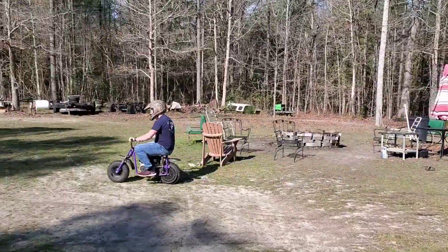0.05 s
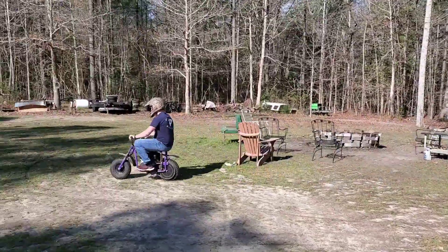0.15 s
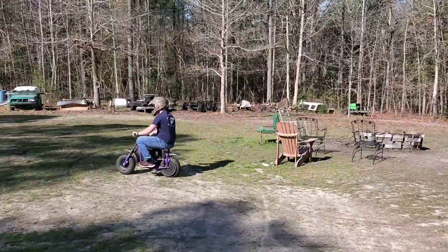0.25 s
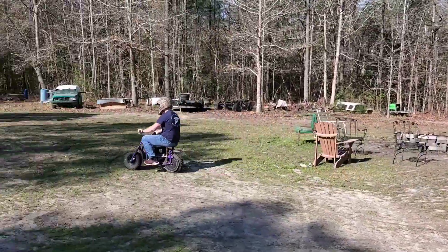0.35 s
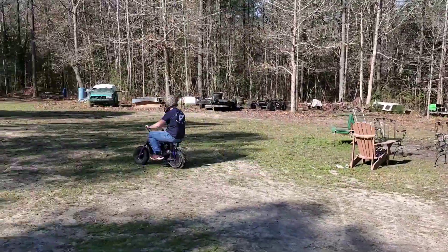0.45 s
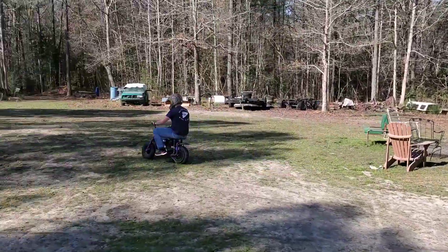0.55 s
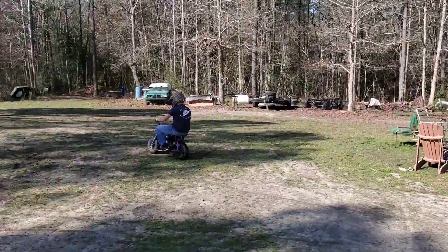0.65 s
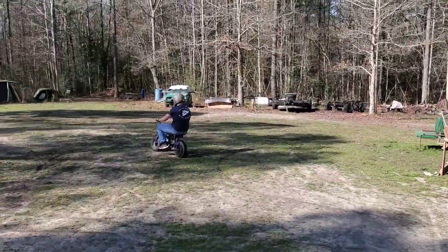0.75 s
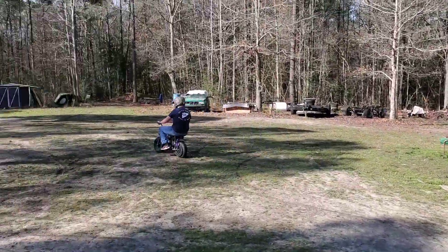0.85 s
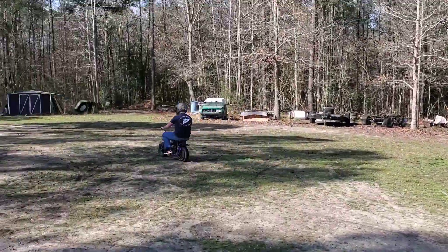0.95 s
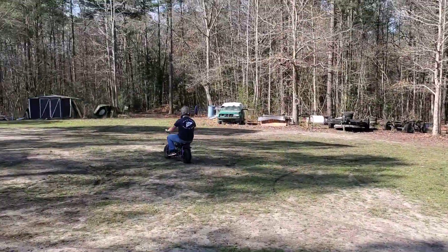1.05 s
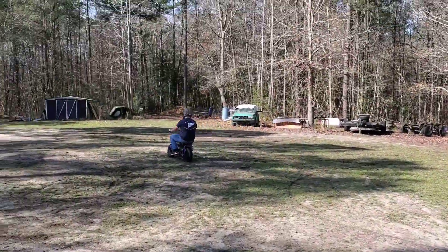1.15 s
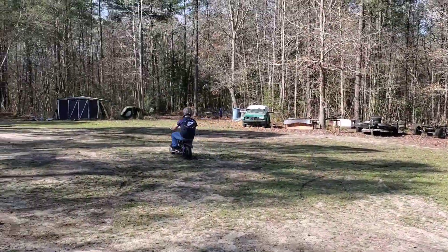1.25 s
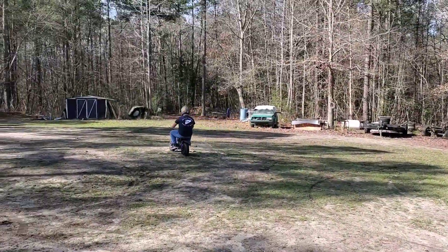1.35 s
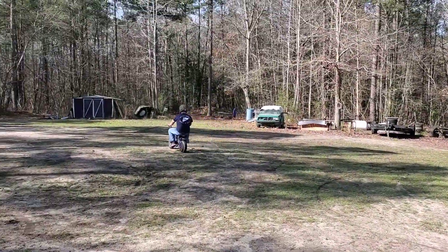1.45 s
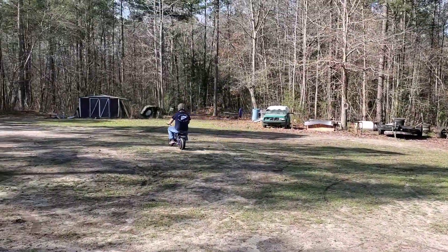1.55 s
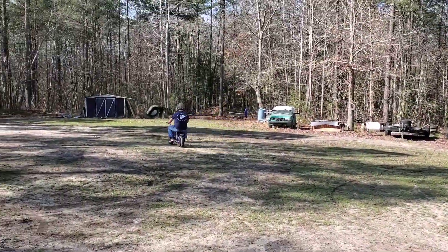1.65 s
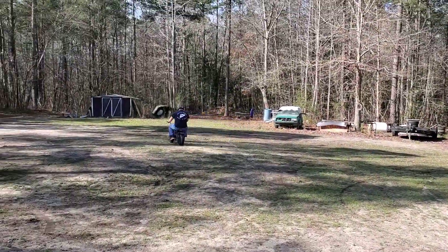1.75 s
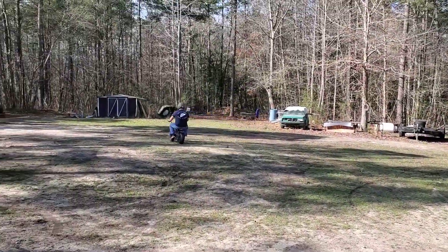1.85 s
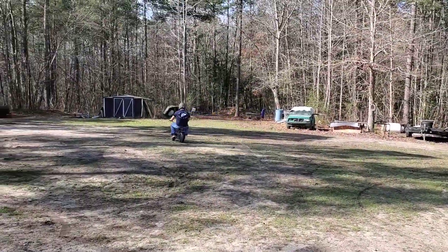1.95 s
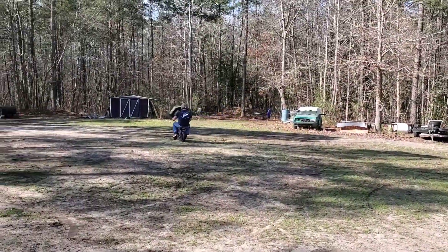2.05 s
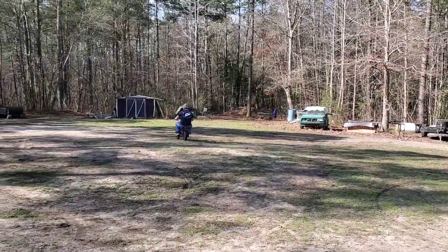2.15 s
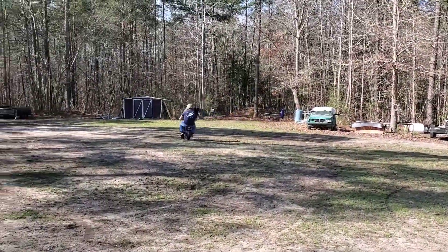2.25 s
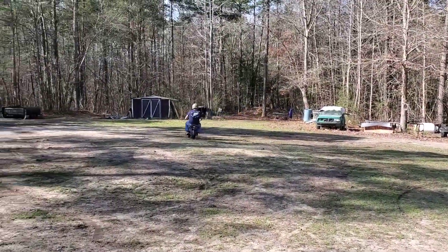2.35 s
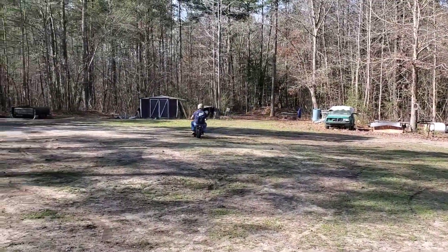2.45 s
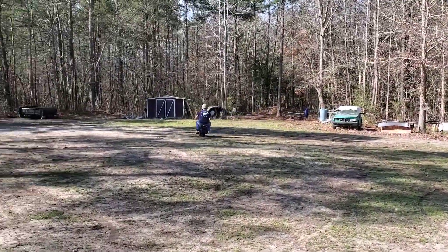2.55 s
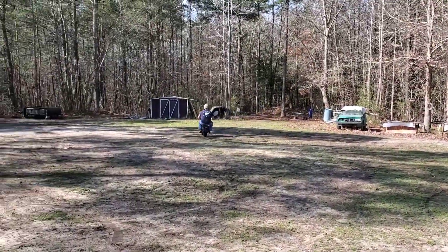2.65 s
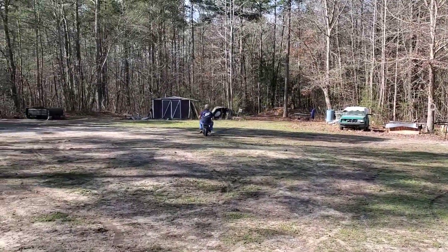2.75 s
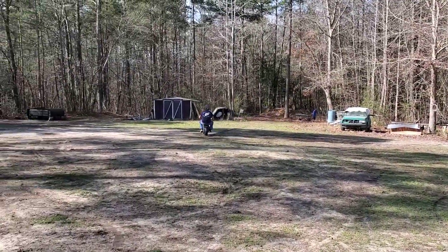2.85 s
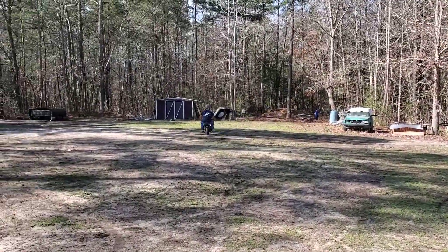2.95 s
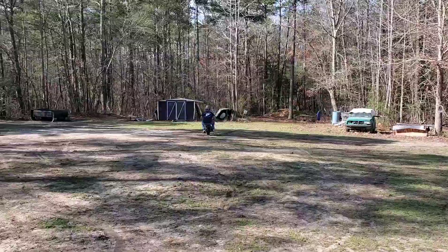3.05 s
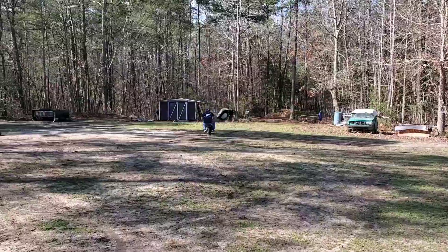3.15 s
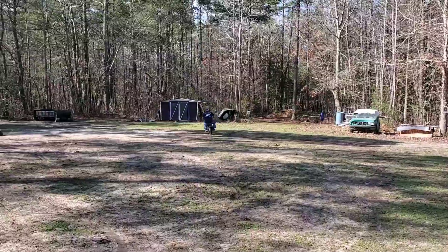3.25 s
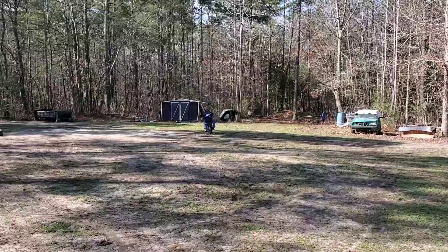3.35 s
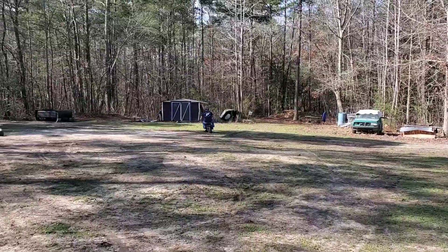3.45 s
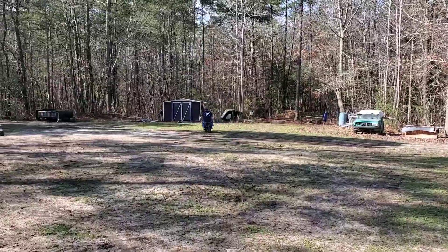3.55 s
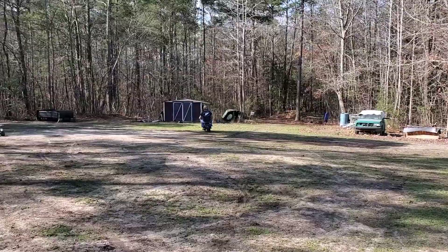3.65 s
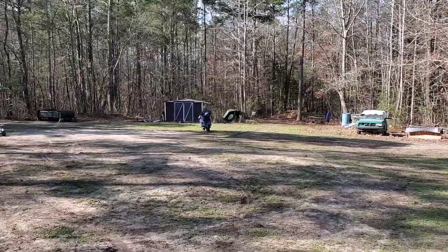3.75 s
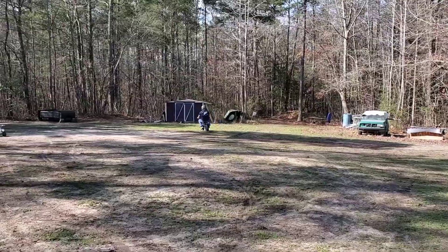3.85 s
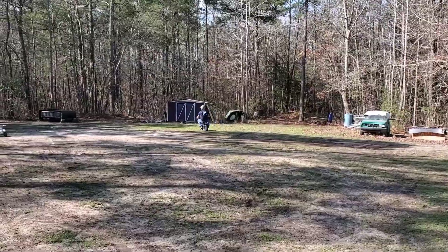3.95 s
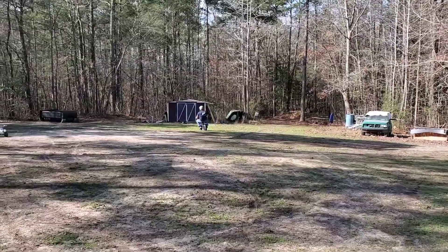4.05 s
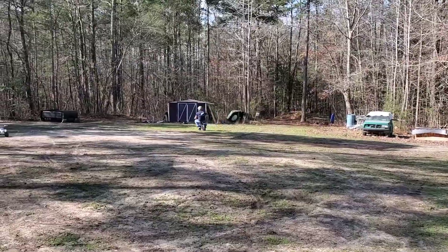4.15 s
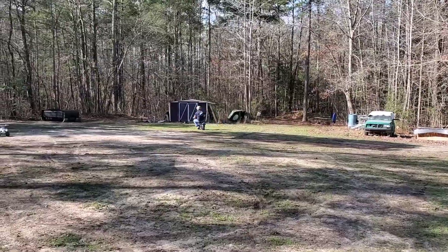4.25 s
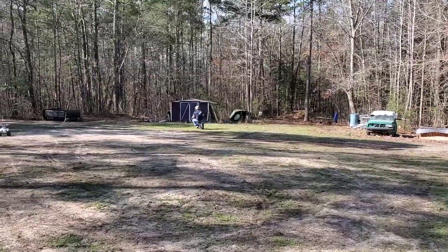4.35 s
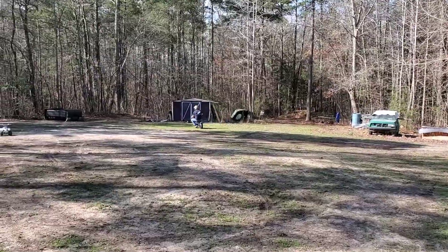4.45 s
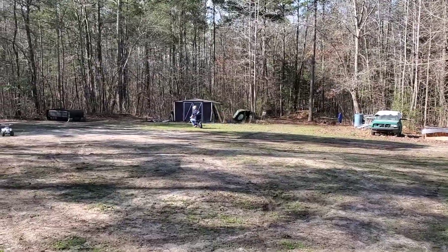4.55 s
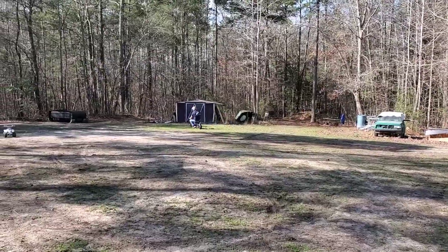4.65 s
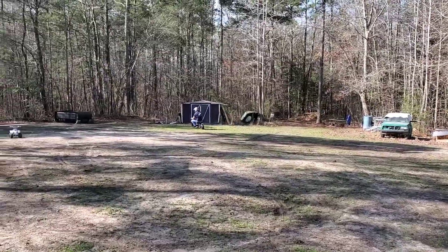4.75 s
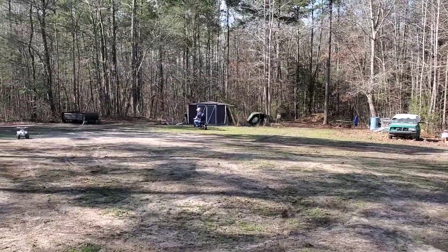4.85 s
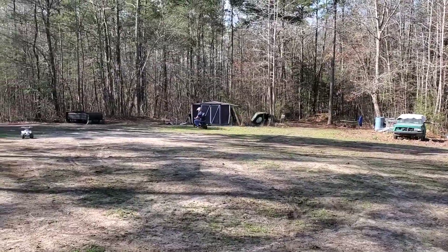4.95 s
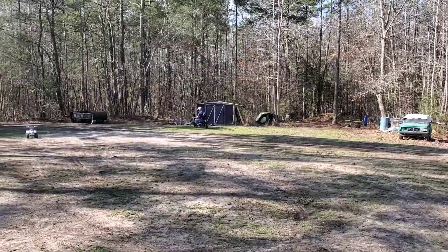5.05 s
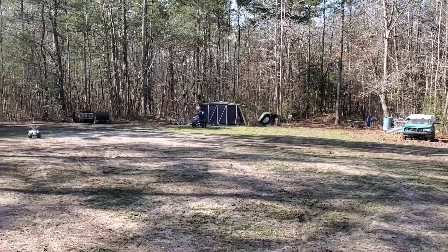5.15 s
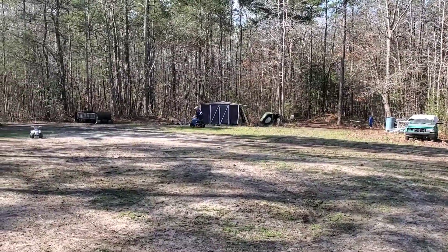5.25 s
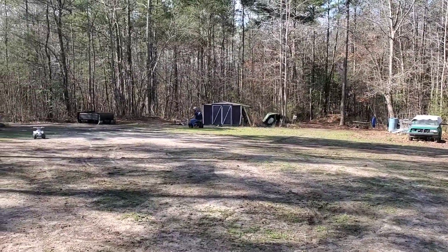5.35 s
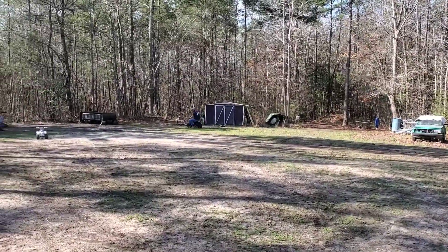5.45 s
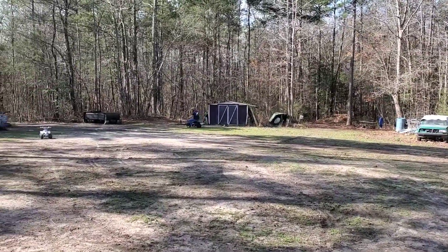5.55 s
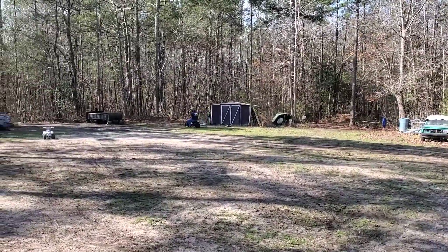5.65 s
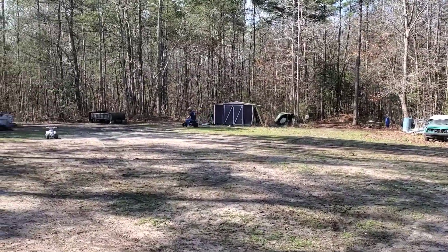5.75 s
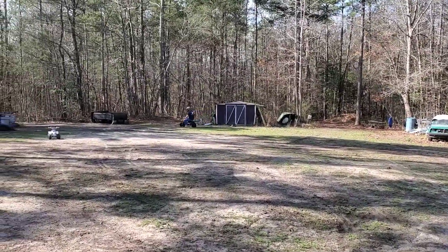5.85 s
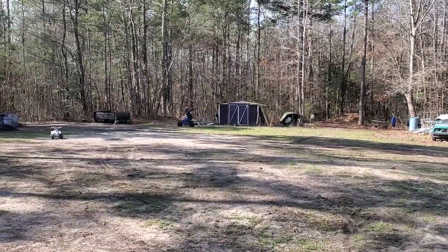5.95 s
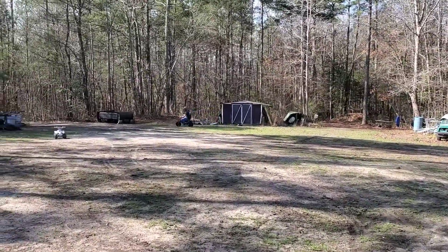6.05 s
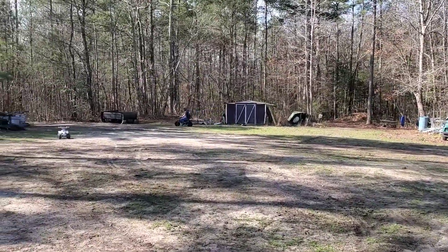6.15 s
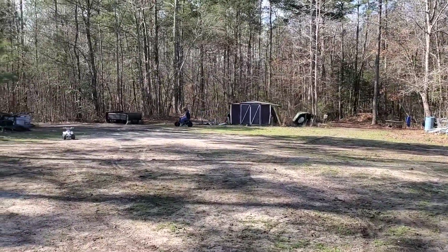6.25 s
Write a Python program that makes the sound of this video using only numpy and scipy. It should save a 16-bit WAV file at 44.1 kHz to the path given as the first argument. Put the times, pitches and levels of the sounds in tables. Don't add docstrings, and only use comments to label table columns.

```python
import sys
import numpy as np
from scipy import signal
from scipy.fft import rfft, irfft
from scipy.io import wavfile
from scipy.ndimage import uniform_filter1d

SR = 44100
rng = np.random.default_rng(int(sys.argv[2]) if len(sys.argv) > 2 else 0)


def makeup_ratio(level_db):
    decades = np.asarray(level_db, float) / 20
    return 10 ** decades


def transcribe(u):
    v = np.clip(np.atleast_2d(u).T, -1, 1)
    q = np.round(v * 32767).astype(np.int16)
    wavfile.write(sys.argv[1], SR, q)


N = 277461
T = np.arange(N) / SR

# time in seconds, firings per second.
FIRING = [(0.0, 23.43), (0.252, 20.61), (0.756, 20.75), (1.008, 19.67), (2.016, 17.48), (2.268, 17.54),
          (2.52, 16.98), (2.772, 17.24), (3.024, 16.0), (3.528, 16.35), (4.032, 15.93), (4.536, 16.76),
          (4.788, 16.36), (5.04, 15.6), (5.544, 15.27), (5.796, 16.47), (6.048, 17.0), (6.3, 16.45)]
FIRST_PHASE, LEAD_S = .39, .0048
LATE_S, LATE_FADE_S = .0018, .5
# pitch in Hz, width in Hz, level in dB.
SILENCER = [
    [(175, 112, 2), (108, 50, -7.5), (255, 120, -6), (520, 240, -12)],
    [(136, 112, 5), (90, 36, -3.5), (265, 60, -15), (480, 220, -4)],
]
# pitch in Hz, width in Hz, level in dB.
INTAKE = [
    [(86, 64, -4), (200, 140, -4)],
    [(82, 42, -5.5), (205, 80, -16)],
]
GULP_PHASE, GULP_DB, GULP_FADE_S = .25, -4, 1.6
# time in seconds, share of the far sound.
FAR = [(0, 0), (2.2, 0), (3.9, 1), (6.3, 1)]
# time in seconds, exhaust level in dB.
EFFORT = [(0, -33.5), (.28, -30.5), (.55, -31.5), (.9, -32), (1.3, -34), (1.85, -34), (2.6, -35),
          (3.3, -34), (3.85, -32), (4.25, -36.5), (5.1, -37.5), (5.75, -39.5), (6.29, -41.5)]
# time in seconds, change in dB.
UNEVEN = [(.115, 2), (.207, 2), (.495, -4.5), (.642, 1), (.885, 3), (1.137, -3), (1.4, -7), (1.56, 0.5),
          (1.615, 2), (1.724, -3), (2.12, -0.5), (2.64, 1.5), (2.874, 2.5), (3.12, 0.5), (3.183, 3),
          (4.9, 3), (5.092, -10), (5.737, 2.5), (5.92, 3), (6.038, 1.5), (5.42, -0.5), (5.61, 2.5),
          (5.35, 2), (5.48, -2), (4.36, 1), (4.48, -2), (4.97, -3), (5.03, 1), (5.68, 1.5), (6.1, 2),
          (.77, -10), (2.21, 6), (2.52, 0.5), (3.04, -6), (3.44, 0.5), (3.62, -1), (5.8, 1.5), (.98, -3),
          (1.75, 2), (1.82, 5), (1.89, 4), (2.01, 0.5), (2.35, 2.5), (2.41, 4), (2.79, -14), (2.94, 3),
          (3.5, 2.5), (3.56, 1.5), (3.709, -19), (3.77, -13), (5.12, -21)]
UNEVEN_S = 0.017
# pitch in Hz, width in Hz, level in dB.
CASE = [(456, 88, -2.5), (1133, 125, -14), (1011, 40, -6.5), (270, 146, 0.5)]
DRONE_WANDER_DB = 2
# time in seconds, pitch in Hz, level in dB.
SHROUD = [(0, 870, -37), (.45, 885, -28.5), (.95, 845, -28.5), (1.05, 840, -32.5), (1.9, 765, -35.5),
          (2.6, 770, -42.5), (3.8, 820, -47), (4.3, 920, -42), (6.29, 940, -43)]

# time in seconds, level in dB.
SHAKE = [(0, 0), (.2, -1), (.75, 0.5), (1.2, 0.5), (1.55, -3), (1.9, -1), (2.25, -5.5), (2.55, -6.5),
         (2.75, -8.5), (2.95, -4), (3.35, -4.5), (3.7, -0.5), (4.1, -7.5), (4.55, -11.5), (5.15, -11.5),
         (5.35, -12), (5.8, -15.5), (6.2, -16.5)]
# time in seconds, lift of high parts in dB,
# lift of low parts in dB.
JOLTS = [(.02, 2, 1), (.08, 1.5, -2.5), (.16, 5, -2.5), (.33, 3, 2), (.49, 3, 1.5), (.85, 3.5, 1),
         (1.23, 1, 3.5), (1.31, -1, 1.5), (1.58, 3.5, 1), (2.31, -2.5, -7.5), (2.42, 1, 1.5),
         (2.501, -3, -5), (2.57, 2, -3.5), (3.099, 0.5, 3), (3.59, 0, 7), (3.8, -4, 1.5), (3.88, -1.5, 4.5),
         (2.02, 4, -2), (2.1, -3.5, -2.5), (2.3, 6.5, 4), (4.28, -0.5, 7.5), (4.68, 4, 6),
         (4.9, -3.5, -0.5), (2.2, -0.5, -1.5), (5.24, -3, -2), (5.29, 2.5, 3), (5.53, 0, 1.5),
         (6.12, 9, 0.5), (6.22, 8.5, 2)]
JOLT_S = 0.026
# start level in dB, share of the control followed, drift in dB per second.
CASE_RULE, TIN_RULE = (-39, 1, -0.053), (-41, 0.99, 0.13)
TYRE_RULE, CHAIN_RULE = (-42, 0.28, -0.86), (-30.5, 0.69, -1.71)
ALIKE_UP_TO_HZ = 10000
# pitch in Hz, width in Hz, level in dB.
TINWARE = [(3470, 150, -2), (4050, 220, 1), (4770, 640, -7), (2500, 120, -4)]
# pitch in Hz, width in Hz, level in dB.
TREAD = [(2310, 610, -6), (1930, 920, 2), (1256, 160, -4.5), (3070, 480, -3.5)]
NEAR_DB, NEAR_S = 6, 0.89
# pitch in Hz, width in Hz, level in dB.
CHAIN = [(9100, 4100, -4), (11730, 4400, -4.5), (13500, 12000, -13), (7030, 2500, -3)]
CHAIN_PAN_DB, CHAIN_PAN_DB_PER_S = -0.5, 0.5
START_LEFT_DB, START_LEFT_S = 1, .35
SPROCKET_HZ, SPROCKET_WIDTH_HZ = 9660, 880
SPROCKET_NEAR, SPROCKET_HIDDEN, TURN_S = 0.24, -0.1, 0.91
# time in seconds, share of the low ring, share of the high ring.
FACING = [(0, 0.86, -0.36), (.6, 0.51, -0.12), (1.2, 0.37, -0.6), (1.6, 0.38, 1), (2.3, 0.17, 0.56),
          (3, 0.97, 0.88), (3.7, -0.24, 0.62), (4.5, 0.14, 0.021), (6.29, 0.39, 1)]
FACING_RINGS = (10200, 530), (11400, 780)

# frequency in Hz, density in dB per Hz.
YARD = [(24, -5.5), (40, -17), (91, -7.5), (209, -16), (330, -16.5), (489, -20), (826, -33.5), (989, -27),
        (2000, -58), (2600, -49), (4400, -120)]
YARD_DB, LEAVES_DB = -39, -42
# time in seconds, lift in dB, length in seconds.
RUSTLE = [(0.333, -5, 0.13), (0.602, 15.5, 0.18), (1.066, 28.5, 0.011), (1.0, -4, 0.32), (1.955, -3, .15),
          (3.21, 11, 0.67), (4.28, 12, 0.027), (4.656, 17.5, 0.0038), (5.008, 4, 0.057), (5.61, 4, 0.07),
          (5.9, 8, 1)]
# time in seconds, lift in dB, length in seconds.
WIND = [(0.25, 10.5, 0.47), (0.954, 10, 0.12), (1.662, 8.5, 0.15), (2.19, 8, 0.044), (2.5, 10, 0.04),
        (3.3, 1, 0.11), (3.9, 16, 0.11), (4.25, 9, 0.12), (4.563, 12, 0.047), (4.91, 6, .05),
        (5.2, -6, 0.054), (5.596, 11, 0.054), (6.122, 14.5, 0.036)]
CALM_DB, CALM_DB_PER_S = -39, -1.5
SHED_S, SHED_DB = .0035, -13
TREES_T60_S, TREES_DB = .3, -12.5
GROUND_DIP = 345, 150, -5
# time in seconds, length in seconds, pitch in Hz, width
# in Hz, share removed (negative lifts).
SHIFTING_BANDS = [(1.54, 0.78, 970, 410, 0.75), (.25, 0.32, 290, 130, -0.24), (2.17, 0.28, 1700, 300, .4),
                  (1.3, 0.23, 420, 64, .4), (2.7, .3, 287, 90, 0.6), (0.64, 0.34, 650, 130, 0.7),
                  (0.21, 0.31, 1620, 530, -.5), (4.5, 0.45, 1340, 170, 0.5), (3.23, 0.23, 5590, 280, -0.4),
                  (3.15, 0.26, 2500, 140, -0.5), (1.23, .5, 890, 180, -0.4), (6, .3, 1360, 170, .3),
                  (2.24, .3, 470, 100, 0.4), (.05, .12, 520, 110, -.5), (5.75, 0.75, 305, 81, 0.5),
                  (4.55, 0.36, 320, 58, 0.9), (3.37, 0.4, 480, 58, 0.8), (1.46, 0.2, 5500, 600, 0.2),
                  (2.28, 0.13, 5800, 350, 0.8), (1.52, 0.088, 7240, 1100, 1.7), (3.6, 0.055, 6700, 630, 1.8),
                  (3.5, .12, 6800, 900, .7), (1.1, .7, 8000, 500, 0.6), (.15, .25, 7100, 600, -1),
                  (2.7, .7, 7760, 290, -2), (5.4, 1.73, 7760, 193, -4), (2.59, 0.42, 2200, 170, 0.6),
                  (5.53, 0.39, 870, 220, 0.7), (0.89, 0.33, 2360, 330, -0.43)]

# time in seconds, peak in dB, pitch in Hz.
KNOCKS = [(.135, -28, 5330), (.16, -36, 5440), (1.275, -29, 3870), (1.495, -30.5, 3520), (1.6, -35, 4050),
          (1.8, -31, 3980), (0.0657, -28, 2230), (0.79, -31.5, 2120), (1.1613, -26, 3860),
          (3.45, -31, 4200), (3.5786, -31, 4200), (3.582, -30.5, 1920), (3.6446, -29, 4050),
          (3.6706, -34, 4120), (3.7007, -26, 4090), (3.7609, -29, 4020), (3.8442, -28.5, 4100),
          (3.921, -31, 4100), (4.1984, -36, 1750), (4.2807, -35.5, 2120), (4.3515, -31.5, 4000),
          (4.6543, -30.5, 1930), (4.6537, -30.5, 5260), (4.654, -36, 6080), (4.684, -40, 3600),
          (5.05, -35, 4200), (1.112, -29, 5750), (1.218, -30, 5750), (4.6833, -29, 1900),
          (6.118, -37, 1100), (6.12, -38, 1800), (2.5425, -39, 5750), (3.05, -37, 2520), (3.2, -33, 2500),
          (3.859, -36, 2490), (6.217, -36, 2130)]
# time in seconds, peak in dB, pitch in Hz.
SLAPS = [(0.0662, -28.5, 10500), (0.09, -16, 10100), (0.1302, -10, 10600), (0.2, -13, 10300),
         (0.2533, -18, 10200), (0.2703, -10, 10000), (0.299, -8.5, 10800), (0.427, -11.5, 10000),
         (0.478, -9.5, 9950), (0.5078, -11, 9700), (0.6035, -15, 10000), (0.6804, -11, 12100),
         (0.832, -10.5, 10300), (0.9328, -16, 11300), (0.9706, -16, 10900), (1.033, -14.5, 10600),
         (1.085, -15, 10600), (1.1403, -17, 11000), (1.172, -9.5, 10400), (1.202, -26, 11900),
         (1.2206, -9, 10400), (1.275, -9.5, 10200), (1.3166, -8.5, 9910), (1.3952, -16.5, 11100),
         (1.42, -7.5, 11600), (1.4606, -13, 10900), (1.485, -13, 10700), (1.5, -10.5, 10500),
         (1.525, -11, 11350), (1.5783, -14, 11000), (1.6082, -17, 11000), (1.654, -26, 10900),
         (1.693, -10, 11600), (1.726, -22, 11600), (1.7515, -12, 11500), (1.7754, -9, 11100),
         (1.814, -11.5, 11300), (1.834, -16, 11200), (1.8821, -11, 10800), (1.9026, -9, 11000),
         (1.934, -12.5, 11000), (1.99, -12.5, 11000), (2.0567, -17, 10900), (2.0941, -16, 11200),
         (2.174, -15.5, 11200), (2.2418, -19, 11100), (2.298, -18, 11000), (2.3516, -19, 11300),
         (2.407, -13.5, 10900), (2.54, -19, 10850), (2.587, -18, 11200), (2.9497, -14, 11700),
         (3.027, -19, 11200), (3.1524, -16.5, 10200), (3.1847, -16, 9870), (3.207, -23, 11200),
         (3.3676, -18.5, 11700), (3.669, -12.5, 11200), (3.8097, -18.5, 10800), (4.0257, -24, 11400)]
SLAP_WIDTH_HZ, SLAP_DB, SLAP_BROAD = 1480, 4.5, 0.17
SLAP_RISE_S, SLAP_DECAY_S = .0075, 0.0069
# time in seconds, level in dB,
# pitch in Hz, length in seconds.
BOOMS = [(0.088, -34.5, 469, 0.018), (5.256, -47, 5160, .008), (0.405, -39, 495, 0.03),
         (4.13, -45, 506, 0.061), (4.33, -48, 489, 0.081), (4.543, -51, 510, 0.033),
         (4.71, -41.5, 515, 0.032), (4.843, -50.5, 500, 0.044), (5.08, -47, 525, .04),
         (5.346, -45, 560, 0.009), (5.522, -39, 497, 0.022), (5.63, -48, 525, .03),
         (5.866, -49, 562, 0.0091), (4.3, -48, 270, 0.17), (4.604, -45, 265.6, 0.068),
         (3.2, -51, 269, 0.16)]
BOOM_WOBBLE_HZ = 14
# time in seconds, peak in dB, pitch in
# Hz.
RUTS = [
    (0.325, -25, 78),
    (.172, -31.5, 81),
    (3.896, -30, 62),
    (3.7, -36, 85),
    (5.41, -38, 80),
    (5.605, -39, 85),
    (2.0, -33.5, 64),
    (5.8, -45, 81),
]
# time in seconds, length in seconds, start in Hz, end in Hz, level in dB.
BIRD = [
    (4.465, .1, 2950, 2380, -61),
    (4.7, .1, 2900, 2480, -63),
    (4.96, .11, 2950, 2520, -60),
    (5.08, .13, 2900, 2380, -65),
]
BIRD_RAGGED_DB, BIRD_WOBBLE_HZ = 4, 80

# frequency in Hz, gain in dB.
LEFT_PORT = [(1500, 1), (2600, 1), (3900, 6.5), (4600, 4.5), (5400, 8), (5750, 19), (6150, -0.5),
             (6950, -4.5), (7250, -7.5), (7700, -21.5), (8000, -3), (8500, -1), (10200, 9), (10900, 6.5),
             (11900, 0.5), (14300, 1)]
RIGHT_PORT = [(1500, 0.5), (2600, 4.5), (3900, 5.5), (4700, 2), (5700, 1), (6500, -10), (7100, -11.5),
              (7600, -17.5), (8150, -17), (8700, -11), (9300, -10), (10300, 0.5), (11400, 11), (12600, 7.5),
              (14300, 11)]
WHISTLE_HZ, WHISTLE_WIDTH_HZ, WHISTLE_DAMPED, WHISTLE_OPENS_S = 5750, 340, 0.77, 0.97
WHISTLE_FLICKER, WHISTLE_PER_S = .3, 25
MASK_DB, MASK_HZ, QUIET_DB, RAGGED_DB = -9, 5500, -85, 2.6


def level(x, db):
    return x * makeup_ratio(db) / np.sqrt(np.mean(x ** 2))


def ring(x, hz, width):
    return signal.lfilter(*signal.iirpeak(hz, hz / width, fs=SR), x)


def ring_twice(x, hz, width):
    return ring(ring(x, hz, width), hz, width)


def body(x, modes):
    return sum(makeup_ratio(db) * ring(x, hz, width) for hz, width, db in modes)


def curve(table):
    s, *columns = np.transpose(table)
    return [np.interp(T, s, c) for c in columns]


def walk(rate):
    k = int(SR / rate)
    held = np.repeat(rng.standard_normal(N // k + 1), k)
    return 0.9 * uniform_filter1d(uniform_filter1d(held, k), k)[:N]


def swells(s, db, length_s):
    return sum(d * np.exp(-((T - c) / w) ** 2) for c, d, w in np.broadcast(s, db, length_s))


def follow(control_db, rule):
    start_db, share, drift_db_per_s = rule
    return start_db + share * control_db + drift_db_per_s * T


def colour(x, points):
    hz, db = np.transpose(points)
    gain_db = np.interp(np.log(np.linspace(1, SR / 2, 4097)), np.log(hz), db)
    c = irfft(gain_db * np.log(10) / 20)
    c[1:4096] *= 2
    c[4097:] = 0
    return signal.fftconvolve(x, irfft(np.exp(rfft(c))))[:N]


def clicks(s, size):
    inside = (s > 0) * (s < T[-1])
    return np.bincount(np.clip(s * SR, 0, N - 1).astype(int), size * inside, N)


def tail(x, decay_s):
    return signal.lfilter([1], [1, -np.exp(-1 / (decay_s * SR))], x)


def pair(alike):
    mid, side = rng.standard_normal((2, N))
    return np.sqrt(1 + alike) * mid + np.sqrt(1 - alike) * side * np.array([[1], [-1]])


def exhaust(phase):
    k = np.arange(1, 120)
    chance = rng.standard_normal((4, len(k)))
    fire_s = np.interp(k, phase, T, right=-1) - LEAD_S + .0003 * chance[0]
    gulp_s = np.interp(k + GULP_PHASE, phase, T, right=-1) - LEAD_S + .0008 * chance[1]
    fire_s, gulp_s = (s + LATE_S * np.exp(-np.abs(s) / LATE_FADE_S) for s in (fire_s, gulp_s))
    fire = clicks(fire_s, makeup_ratio(1.2 * chance[2]))
    gulp_db = GULP_DB * np.clip(gulp_s / GULP_FADE_S, 0, 1)
    gulp = clicks(gulp_s, makeup_ratio(gulp_db + 1.3 * chance[3]))

    def heard(pipe, box):
        thump = sum(makeup_ratio(db) * ring_twice(fire, hz, w) / w for hz, w, db in pipe)
        pull = sum((-1) ** j * makeup_ratio(db) * ring_twice(gulp, hz, w) / w for j, (hz, w, db) in enumerate(box))
        return level(thump - pull, 0)

    near, far = (heard(pipe, box) for pipe, box in zip(SILENCER, INTAKE))
    share = curve(FAR)[0]
    gas = rng.standard_normal(N) * (0.16 + np.exp(-(phase % 1) / 0.91))
    return near * (1 - share) + far * share + level(body(gas, SILENCER[0]), -19)


def case(phase):
    gas = rng.standard_normal(N) * makeup_ratio(DRONE_WANDER_DB * walk(13))
    return level(body(gas * (1 + 0.24 * np.exp(-(phase % 1) / 0.32)), CASE), 0)


def shroud(phase):
    hz, db = curve(SHROUD)
    turn = 2 * np.pi * np.cumsum(hz) / SR
    push = .5 + np.exp(-(phase % 1) / .3)
    fan = walk(340) * np.cos(turn) + walk(340) * np.sin(turn)
    return level(fan * push, -12) * makeup_ratio(db)


def rattle(phase, rate, spread_db, decay_s, bed):
    chance = rng.random((2, 3000))
    s = np.cumsum(-np.log(1 - chance[0]) / rate)
    grains = tail(clicks(s, makeup_ratio(-spread_db * np.log(1 - chance[1] / 1.03))), decay_s)
    nudge_db = 0.72 * np.cos(4 * np.pi * phase) + 0.76 * np.cos(2 * np.pi * phase - 0.6)
    return level((bed + grains) * makeup_ratio(nudge_db + 1.44 * walk(20)), 0)


def parts(shake, modes, alike, own_db):
    out = 0
    for hz, width, db in modes:
        noise = pair(alike * min(1, (ALIKE_UP_TO_HZ / hz) ** 3))
        rung = np.array([ring(n * shake, hz, width) for n in noise])
        out = out + makeup_ratio(db + own_db * walk(20)) * level(rung, 0)
    return level(out, 0)


def tinware(phase, shake_db, high_db, low_db):
    tin = parts(rattle(phase, 200, 3.6, 0.004, 2.2), TINWARE, 0.49, 1.4)
    return tin * makeup_ratio(follow(shake_db, TIN_RULE) + 0.5 * (low_db + high_db))


def tyres(phase, shake_db, low_db):
    tread = parts(rattle(phase, 300, 0.63, 0.0033, 3.3), TREAD, 0.47, 3.1)
    return tread * makeup_ratio(follow(shake_db, TYRE_RULE) + NEAR_DB * np.exp(-T / NEAR_S) + low_db)


def chain(phase, shake_db, high_db):
    links = parts(rattle(phase, 330, 2.5, .003, 3), CHAIN, .6, 2)
    pan_db = CHAIN_PAN_DB + CHAIN_PAN_DB_PER_S * T + START_LEFT_DB * np.exp(-T / START_LEFT_S)
    links = links * makeup_ratio(follow(shake_db, CHAIN_RULE) + high_db + pan_db * np.array([[.5], [-.5]]))
    facing = SPROCKET_HIDDEN + (SPROCKET_NEAR - SPROCKET_HIDDEN) * np.exp(-T / TURN_S)
    links = links + facing * ring(links, SPROCKET_HZ, SPROCKET_WIDTH_HZ)
    return links + sum(share * ring(links, *r) for share, r in zip(curve(FACING), FACING_RINGS))


def yard():
    rumble = level(np.array([colour(n, YARD) for n in pair(0.93)]), YARD_DB)
    leaves = np.array([ring(n, 6000, 2500) for n in pair(0.81)]) * makeup_ratio(0.49 * walk(3.64))
    return rumble + level(leaves, 0) * makeup_ratio(LEAVES_DB + swells(*np.transpose(RUSTLE)) - 9.5)


def wind():
    gusts = np.array([ring(ring(n, 52, 50), 58, 60) * makeup_ratio(2.5 * walk(9)) for n in pair(.3)])
    gust_db = CALM_DB + CALM_DB_PER_S * T + swells(*np.transpose(WIND))
    return level(gusts, 0) * makeup_ratio(gust_db + np.array([[2.5], [-2.5]]))


def shed(x):
    return makeup_ratio(SHED_DB) * np.roll(x, int(SHED_S * SR)) * np.array([[1], [-1]])


def trees(x):
    t = T[:SR // 2]
    echo = rng.standard_normal((2, len(t))) * makeup_ratio(-60 * t / TREES_T60_S) * (t > .012)
    return signal.fftconvolve(x[None], level(echo, TREES_DB) / np.sqrt(len(t)))[:, :N]


def shifting_bands(x):
    return x - sum(swells([s], share, w) * ring(x, hz, width) for s, w, hz, width, share in SHIFTING_BANDS)


def knocks():
    out = np.zeros(N)
    for s, db, hz in KNOCKS:
        i = int(s * SR)
        burst = rng.standard_normal(1500) * np.exp(-T[:1500] / 0.0055)
        out[i:i + 1500] += makeup_ratio(db) * (5 * ring_twice(burst, hz, 560) + 0.25 * burst)[:N - i]
    return out


def slaps():
    out, t = np.zeros((2, N)), T[:2000]
    shape = (1 - np.exp(-t / SLAP_RISE_S)) * np.exp(-t / SLAP_DECAY_S)
    for s, db, hz in SLAPS:
        i = int((s - SLAP_RISE_S / 2) * SR)
        burst = (rng.standard_normal(len(t)) + .5 * rng.standard_normal((2, len(t)))) * shape
        broad = ring(rng.standard_normal((2, len(t))) * shape, 11500, 7000)
        out[:, i:i + len(t)] += makeup_ratio(db + SLAP_DB) * (ring(burst, hz, SLAP_WIDTH_HZ) + SLAP_BROAD * broad)
    return out


def booms():
    wobble, ragged = BOOM_WOBBLE_HZ * walk(40), makeup_ratio(2.2 * walk(45))
    out = np.zeros(N)
    for s, db, hz, length_s in BOOMS:
        tone = np.sqrt(2) * np.sin(2 * np.pi * np.cumsum(hz + wobble) / SR)
        out += makeup_ratio(db) * np.exp(-((T - s) / length_s) ** 2) * tone
    return ragged * out


def ruts():
    return sum(ring_twice(clicks(np.array([s]), makeup_ratio(db) * SR / 60), hz, 75) for s, db, hz in RUTS)


def bird():
    out, ragged, wobble = np.zeros(N), makeup_ratio(BIRD_RAGGED_DB * walk(70) + 6), BIRD_WOBBLE_HZ * walk(90)
    for s, length_s, from_hz, to_hz, db in BIRD:
        u = np.clip((T - s) / length_s, 0, 1)
        hz = from_hz + (to_hz - from_hz) * u + wobble
        out += makeup_ratio(db) * np.sqrt(2) * np.sin(np.pi * u) * np.sin(2 * np.pi * np.cumsum(hz) / SR)
    return out * ragged


def scene():
    phase = FIRST_PHASE + np.cumsum(curve(FIRING)[0]) / SR
    effort_db, shake_db = curve(EFFORT)[0], curve(SHAKE)[0]
    s, high_db, low_db = np.transpose(JOLTS)
    high_db, low_db = swells(s, high_db, JOLT_S), swells(s, low_db, JOLT_S)
    low = exhaust(phase) * makeup_ratio(effort_db + swells(*np.transpose(UNEVEN), UNEVEN_S))
    low = low + case(phase) * makeup_ratio(follow(effort_db + 32, CASE_RULE) + 0.4 * low_db)
    low = low + shroud(phase) + knocks() + booms() + ruts() + bird()
    low = low - body(low, [GROUND_DIP]) * (1 + .5 * curve(FAR)[0])
    clatter = tinware(phase, shake_db, high_db, low_db) + tyres(phase, shake_db, low_db)
    clatter = clatter + chain(phase, shake_db, high_db) + slaps()
    return shifting_bands(low + shed(low) + trees(low) + clatter + yard()) + wind()


def mask(x):
    how = dict(fs=SR, window="cosine", nperseg=2048, noverlap=1024)
    hz, _, z = signal.stft(np.array([x[0] + x[1], x[0] - x[1]]) / 2, **how)
    power = uniform_filter1d(np.abs(z) ** 2, size=2, axis=2)
    narrow = np.repeat(uniform_filter1d(power, size=5, axis=1)[:, 2::5], 5, axis=1)
    wide = uniform_filter1d(power * (hz[:, None] > 600), size=int(MASK_HZ / hz[1]), axis=1)
    ragged_db = RAGGED_DB * np.repeat(rng.standard_normal(z[:, 2::5].shape), 5, axis=1)
    floor = makeup_ratio(2 * MASK_DB) * wide * makeup_ratio(2 * ragged_db) + makeup_ratio(2 * QUIET_DB)
    hidden = (narrow < floor) & (hz[:, None] > 1200)
    mid, side = signal.istft(z * ~hidden, **how)[1][:, :N]
    return np.array([mid + side, mid - side])


def roll_off(x):
    return signal.sosfilt(signal.butter(12, 15680, fs=SR, output="sos"), x)


def record(dry):
    left, right = colour(dry[0], LEFT_PORT), colour(dry[1], RIGHT_PORT)
    damped = WHISTLE_DAMPED * np.exp(-(T / WHISTLE_OPENS_S) ** 4)
    left = left - damped * ring(left, WHISTLE_HZ, WHISTLE_WIDTH_HZ)
    flicker = WHISTLE_FLICKER * walk(WHISTLE_PER_S) - .1
    left = left + flicker * ring(left, WHISTLE_HZ, WHISTLE_WIDTH_HZ)
    both = signal.lfilter(*signal.butter(2, 45, "high", fs=SR), [left, np.roll(right, 2)])
    cut = signal.ellip(10, .2, 80, 14430, fs=SR, output="sos")
    return roll_off(mask(signal.sosfilt(cut, both)))


dry = scene()
out = record(dry)
transcribe(out)
```